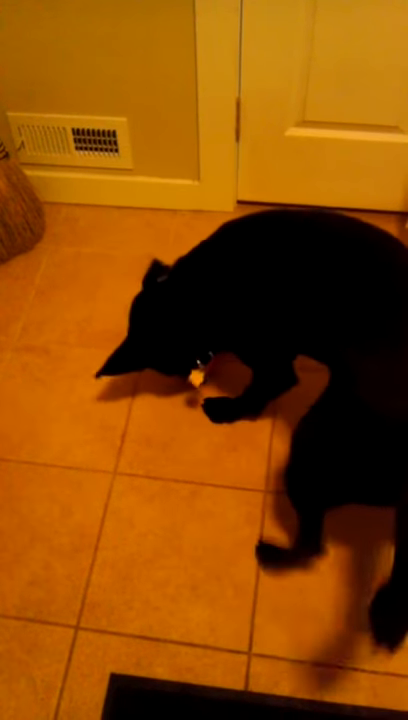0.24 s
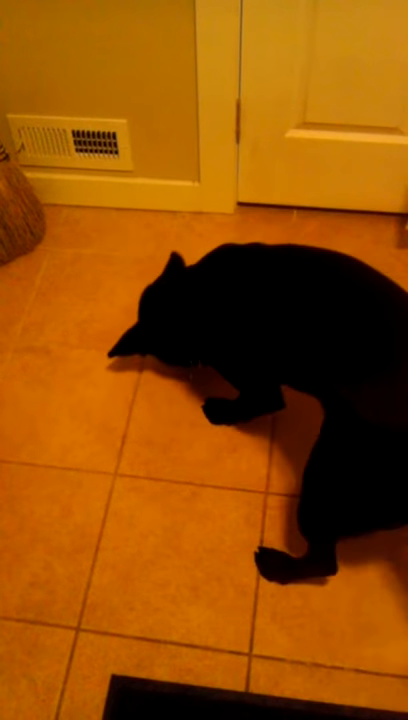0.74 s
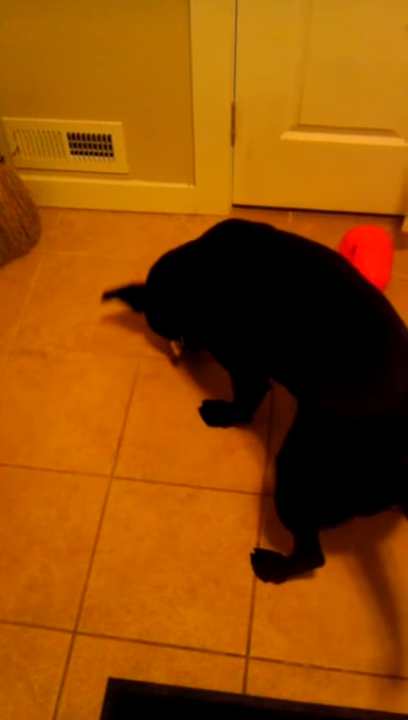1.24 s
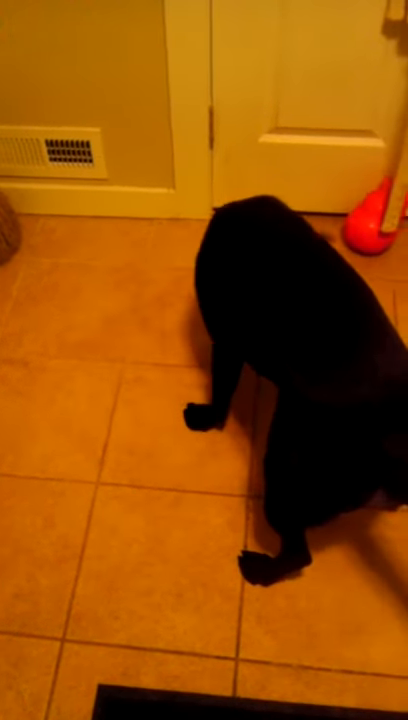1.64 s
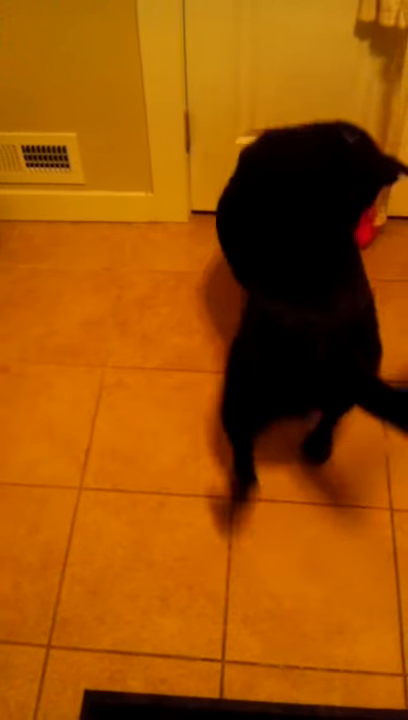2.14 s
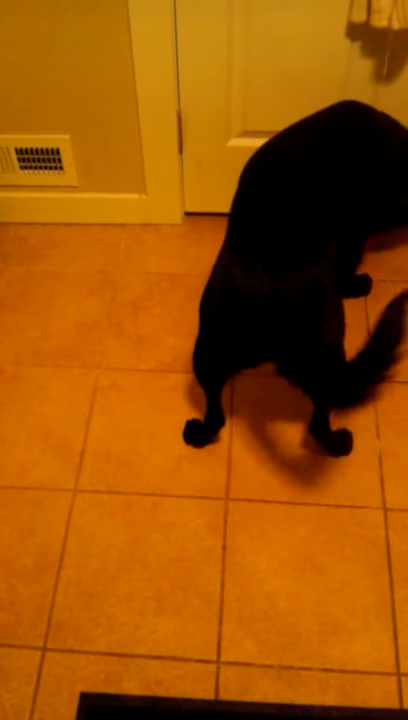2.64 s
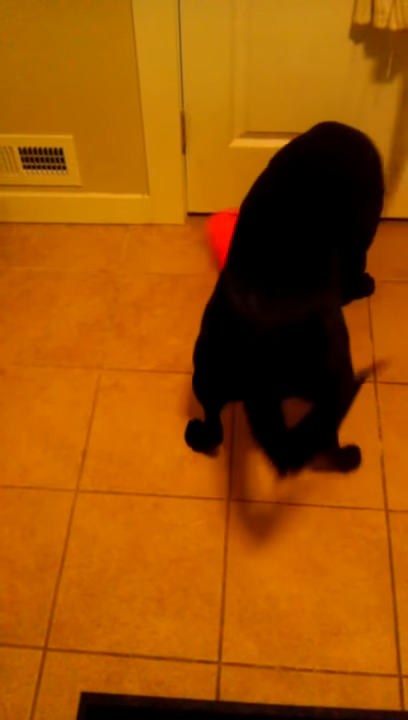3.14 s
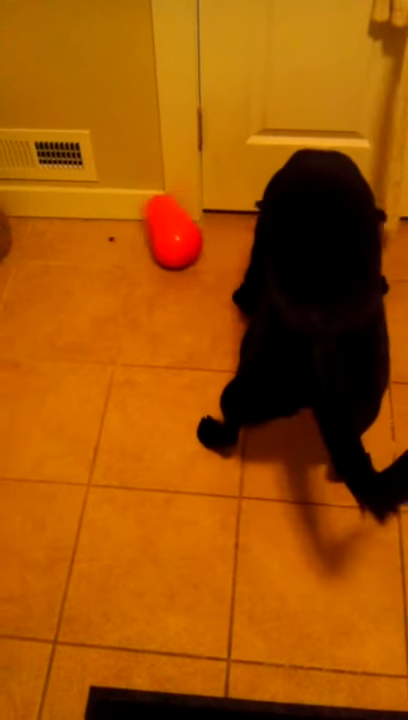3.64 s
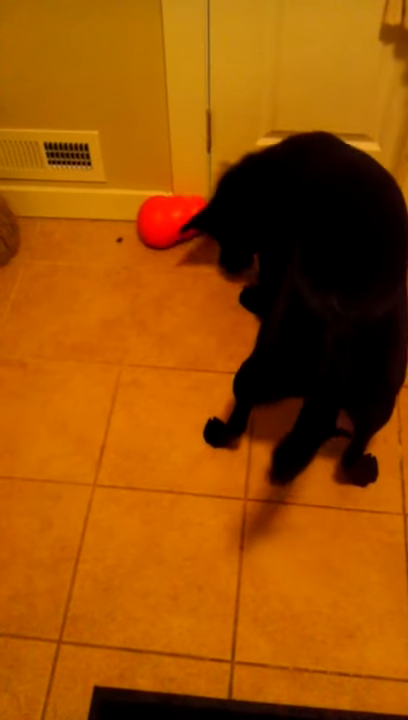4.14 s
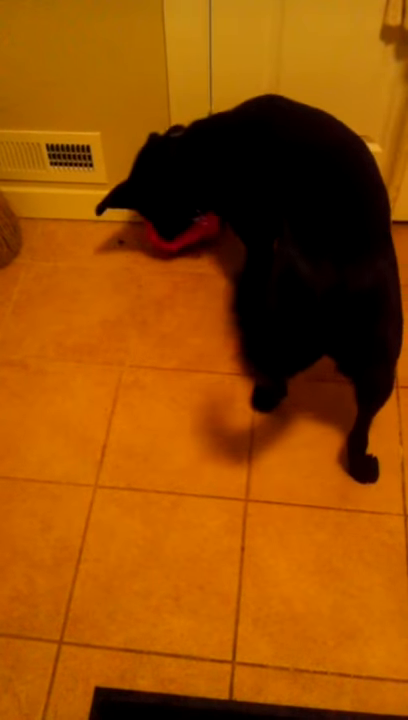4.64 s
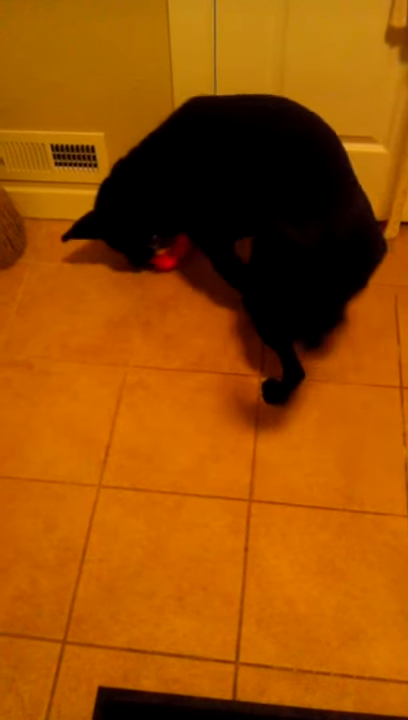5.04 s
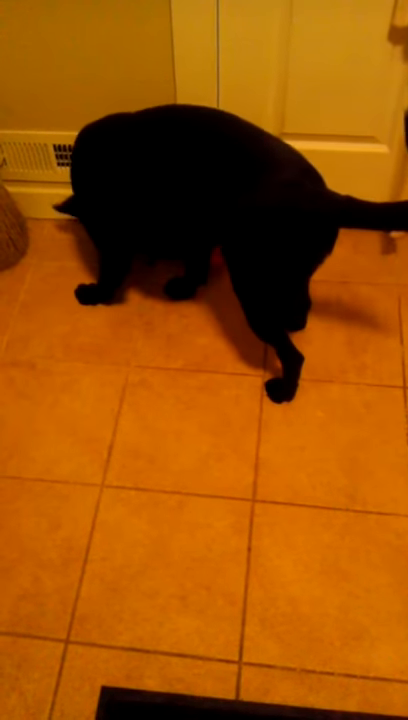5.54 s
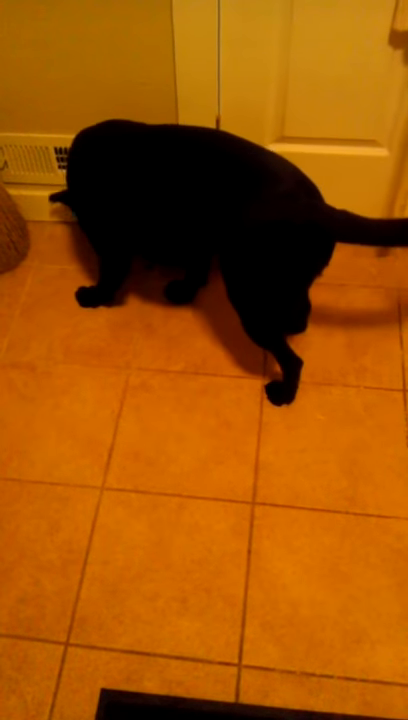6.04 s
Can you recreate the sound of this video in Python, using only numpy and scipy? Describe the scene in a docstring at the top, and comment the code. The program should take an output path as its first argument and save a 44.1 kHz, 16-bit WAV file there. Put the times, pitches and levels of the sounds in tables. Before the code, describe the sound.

Hollow plastic knocks, low rolling and bright kibble rattles as a dog noses a food toy across indoor tiles.

```python
"""A tiled hall: a dog noses a hollow hard plastic food toy, a couple of metres from a phone.
The shell knocks on tiles, door and skirting, ringing in low modes, and rolls with a rumble.
Kibble tumbles against its thin wall, claws tick, the dog snuffles, the house gives a steady hush.
One microphone; the phone spreads it to stereo with two delayed copies and clips the loudest knocks."""
import sys
import numpy as np
from scipy import signal
from scipy.fft import rfft, irfft, next_fast_len
from scipy.io import wavfile
from scipy.ndimage import uniform_filter1d

SR = 44100
rng = np.random.default_rng(int(sys.argv[2]) if len(sys.argv) > 2 else 0)


def unload_audio(sound):
    """Save the sound as a 16-bit wav file, at the path given as the first command line argument."""
    columns = np.transpose(np.atleast_2d(sound))
    # keep every value between -1 and 1, then stretch to whole-number steps
    steps = np.round(np.clip(columns, -1, 1) * 32767)
    wavfile.write(sys.argv[1], SR, steps.astype(np.int16))


N = 277389


def undb(db):
    """dB to gain."""
    return 10 ** (np.asarray(db) / 20)


def unit(x):
    """Scale to rms 1."""
    return x / np.sqrt(np.mean(x ** 2))


def unit_onset(x):
    """Scale the first 20 ms to rms 1."""
    return x / np.sqrt(np.mean(x[:SR // 50] ** 2))


def fade(t60_s, count):
    """Exponential decay."""
    return np.exp(-np.log(1000) * np.arange(count) / SR / t60_s)


def held_fade(t60_s, count, bend):
    """Decay that holds at first, then falls ever faster."""
    return fade(t60_s, count) ** ((np.arange(count) / SR / t60_s) ** bend)


def ring(x, hz, width_hz):
    """Two-pole resonance, gain 1 at the centre."""
    return signal.lfilter(*signal.iirpeak(min(hz, .45 * SR), hz / width_hz, fs=SR), x)


def ring_twice(x, hz, width_hz):
    """Two equal resonances in series."""
    return ring(ring(x, hz, width_hz), hz, width_hz)


def add(track, time_s, sound):
    """Mix a sound in at a time."""
    start = int(time_s * SR)
    track[start:start + len(sound)] += sound[:N - start]


def grains(count, per_s, spread_db):
    """Random clicks of either sign and uneven size."""
    hit = rng.random(count) < per_s / SR
    size = np.minimum(rng.exponential(size=count), 3)
    return hit * np.sign(rng.standard_normal(count)) * undb(spread_db * size)


def wander(rate_hz):
    """Smooth random drift, rms 1."""
    span = int(SR / rate_hz)
    return unit(uniform_filter1d(uniform_filter1d(rng.standard_normal(N), span), span))


def hush():
    """Steady noise of the house and the microphone."""
    # noise spectrum: (frequency [Hz], relative density [dB])
    spectrum = [(15, -56), (25, -19), (54, -9), (159, -8), (323, 3.5), (578, -0.5), (714, 4.5),
                (2530, -15.5), (5450, -10.5), (8090, -43.5), (9740, -25.5), (12700, -28.5), (13700, -27)]
    at_hz, density_db = np.transpose(spectrum)
    hz = np.fft.rfftfreq(N, 1 / SR) + 1
    shape = undb(np.interp(np.log(hz), np.log(at_hz), density_db))
    level_db = -51 + 0.66 * wander(rate_hz=1)
    return undb(level_db) * unit(irfft(rfft(rng.standard_normal(N)) * shape, N))


def hall(x):
    """Direct sound plus dense reflections off tiles and walls."""
    # reverberation: (frequency [Hz], t60 [s], relative level [dB])
    reverb = [(100, 0.27, -21), (249, 0.52, -4), (690, 0.19, -1.5), (1880, 0.36, -2), (4400, 0.32, 1.5),
              (8500, 0.15, 5), (12900, 0.073, -0.5)]
    wet_db, early_db, early_s = -6.5, 4, 0.035
    at_hz, t60s, levels = np.transpose(reverb)
    count = int(.6 * SR)
    t = np.arange(count) / SR
    tail = 0
    for hz in 100 * 2 ** np.arange(0, 7.1, .5):
        band = signal.butter(2, [hz / 2 ** .25, hz * 2 ** .25], "bandpass", fs=SR, output="sos")
        t60_s, db = (np.interp(np.log(hz), np.log(at_hz), column) for column in (t60s, levels))
        tail += undb(db) * signal.sosfilt(band, rng.standard_normal(count)) * fade(t60_s, count)
    tail *= undb(early_db / (1 + (t / early_s) ** 6))  # nearby walls and door
    tail *= np.clip(t / 0.0014, 0, 1)
    tail /= np.sqrt(np.sum(tail ** 2))
    return x + signal.fftconvolve(x, undb(wet_db) * tail)[:N]


def snuffles():
    """Breathy puffs through the nose: quick rise, rounded end."""
    # puffs: (time [s], level [dB], resonance [Hz], length [s])
    puffs = [(0.142, -45.5, 780, 0.14), (0.351, -46.5, 620, 0.053), (2.09, -49, 710, 0.064),
             (2.199, -40.5, 386, 0.052), (2.421, -40.5, 870, 0.072), (3.233, -40.5, 845, 0.072),
             (3.523, -41.5, 710, 0.067), (5.458, -46, 930, 0.12), (5.709, -41.5, 436, 0.065),
             (5.969, -51.5, 323, 0.14), (6.046, -45, 470, 0.046), (6.108, -48.5, 910, 0.072)]
    out = np.zeros(N)
    t = np.arange(int(.4 * SR)) / SR
    for time_s, db, hz, length_s in puffs:
        breath = rng.standard_normal(len(t))
        puff = unit(ring_twice(breath, 430, 670) + ring(breath, hz, 110))
        envelope = np.clip(t / 0.0042, 0, 1) * np.exp(-(t / length_s) ** 2)
        add(out, time_s, undb(db) * puff * envelope)
    return out


def toy_wall(impacts, top_db=0):
    """Thin plastic ringing under small impacts; top_db shifts the modes above 6 kHz."""
    # wall resonances as the microphone colours them: (centre [Hz], width [Hz], gain [dB])
    resonances = [(2730, 4500, -8.5), (3790, 2520, 6), (5950, 3490, 7), (6520, 2400, 16),
                  (7540, 5960, 12.5), (8870, 660, 15), (8970, 290, 12.5), (10000, 2200, 6)]
    return sum((-1) ** k * undb(db + top_db * (hz > 6000)) * ring(impacts, hz, width_hz)
               for k, (hz, width_hz, db) in enumerate(resonances))


def rolling():
    """The shell bumps over tile glaze, joints and grit while kibble slides and tumbles."""
    # toy in motion: (time [s], rumble [dB], upper rumble modes re lowest [dB], kibble [dB], grit [dB])
    motion = [(0.0, -52, -2, -37, -50.5), (0.35, -61, -1, -59, -82), (0.56, -42.5, 0, -50, -54),
              (0.67, -32.5, 5, -40.5, -48), (0.76, -33.5, 12, -44.5, -44.5), (0.82, -53, 3, -53, -45),
              (0.92, -28, 4, -51, -40.5), (1.03, -45.5, 10, -59, -50), (1.12, -35, -1.5, -53, -52),
              (1.4, -45, 1.5, -48.5, -47.5), (1.72, -27.5, -2, -49.5, -51),
              (1.81, -44.5, -4.5, -72.5, -50.5), (1.911, -29, -1, -50, -50), (2.02, -49, -2, -59, -80),
              (2.64, -62, -3, -68, -88), (2.848, -35, -7, -19, -28.5), (3.01, -34.5, 14, -43.5, -38.5),
              (3.26, -42, -10, -58, -62.5), (3.4, -32.5, -3.5, -48.5, -46.5), (3.75, -45.5, -4, -55.5, -69),
              (3.9, -27.5, -6, -49, -52), (4.03, -53, 6, -54, -89), (4.62, -62, 8, -58, -57),
              (4.69, -38.5, 4, -42.5, -42.5), (4.77, -30, 8, -26.5, -38.5), (4.9, -56, 0, -58, -50),
              (5.09, -45, 4, -37.5, -46), (5.208, -30, 6, -27.5, -37.5), (5.33, -47.5, -1, -70, -68),
              (5.55, -55, -5, -50.5, -54.5), (6.29, -76, -5, -57.5, -66)]
    times_s, *levels = np.transpose(motion)
    t = np.arange(N) / SR
    rumble_db, upper_db, kibble_db, grit_db = (np.interp(t, times_s, column) for column in levels)
    bumps = grains(N, per_s=500, spread_db=1.5)
    lowest = ring_twice(bumps, 127.5, 23)
    upper = (ring(ring(bumps, 156.3, 31), 160.7, 33)
             + 0.5 * ring(ring(bumps, 181, 52), 179, 52)
             + 0.12 * ring(ring(bumps, 233, 110), 234, 100))
    rumble = (lowest + undb(upper_db) * upper) / np.hypot(1, undb(upper_db))
    kibble = toy_wall(grains(N, per_s=2700, spread_db=1.5) * undb(2 * wander(rate_hz=32)))
    specks = grains(N, per_s=1200, spread_db=6)
    grit = ring(specks, 1240, 560) + ring(specks, 1980, 420) + 0.41 * ring(specks, 4200, 1070)
    return undb(rumble_db) * unit(rumble) + undb(kibble_db) * unit(kibble) + undb(grit_db) * unit(grit)


def clatters():
    """Kibble, shell edge and claws: a strike, then a dying shower of clicks that rings the wall."""
    # strikes: (time [s], level [dB], ring centre [Hz], body re bright part [dB], shower t60 [s],
    # strike squareness [dB])
    strikes = [(0.0165, -37, 7840, -19, 0.082, -10), (0.04, -42, 6750, -31, 0.047, -27),
               (0.1042, -46.5, 7550, -5, .07, -10), (0.2304, -42, 8500, -9.5, 0.25, -25),
               (0.2538, -45.5, 8300, -0.5, 0.13, 8), (0.4115, -52.5, 5700, -24, .12, 0),
               (0.5203, -46, 4900, -15, 0.098, 6), (0.6465, -40, 6100, -7.5, 0.33, -1),
               (0.7363, -34.5, 5670, -18, 0.21, 1), (0.8052, -32, 4970, -1, 0.31, -2),
               (0.8599, -36.5, 4520, -6.5, 0.19, -7), (0.9482, -38, 7800, -26, .12, 1),
               (0.9776, -35.5, 5070, 0, .22, -9), (1.0531, -41, 5330, -3.5, .04, -1),
               (1.2146, -44, 5890, -32, 0.32, -3), (1.3327, -41.5, 3160, -1, 0.19, 4),
               (1.3748, -42, 6000, 1.5, 0.17, 2), (1.474, -46, 4660, -42, 0.041, -6),
               (1.5642, -16, 8700, -5, 0.12, 1.5), (1.724, -44.5, 4740, -4, 0.033, 7),
               (1.8328, -41, 3950, -6, 0.042, 2), (1.8528, -32, 5300, -5.5, 0.11, -3),
               (2.1206, -50, 7900, -35, 0.12, -7), (2.146, -43, 7760, -12, 0.19, -24),
               (2.266, -43, 7840, -9.5, 0.26, -27), (2.299, -37.5, 7440, -13, .05, -22),
               (2.427, -47, 6060, -6, 0.25, -23), (2.5257, -46, 8250, -11, 0.096, 3),
               (2.5813, -41, 9100, -5, 0.27, 4), (2.6765, -17.5, 7560, -18, 0.14, -9),
               (2.6968, -19, 6440, -7.5, 0.1, 5), (2.7806, -24, 8400, -38, .12, 1),
               (2.809, -27.5, 5400, -1, 0.08, -14), (2.8296, -16.5, 5800, -10, 0.12, -7),
               (2.9118, -25.5, 4900, 0, 0.079, 2), (2.929, -22, 5000, -6, 0.091, 9),
               (2.9546, -20.5, 5830, -6.5, 0.27, 9), (3.138, -42, 5000, -7, .06, 7),
               (3.1922, -37.5, 5630, -2, 0.2, 9), (3.2774, -44, 6700, 1, 0.3, -3),
               (3.3103, -23, 7750, -7.5, 0.22, -1), (3.3343, -23.5, 5100, -4.5, 0.041, -15),
               (3.3797, -30.5, 8200, -8.5, 0.087, 13), (3.494, -43.5, 7700, -25, 0.33, -7),
               (3.533, -39.5, 4050, -11, .07, -26), (3.713, -43.5, 8350, -10.5, 0.33, 9),
               (3.7958, -31, 3280, 0, 0.16, 7), (3.8322, -29.5, 5260, -5.5, 0.11, 3),
               (3.874, -38, 7360, -1, 0.087, 0), (4.055, -36.5, 5970, -1, 0.19, -17),
               (4.2006, -16.5, 7400, -5.5, 0.062, -13.5), (4.366, -52, 3280, 7, 0.11, 1),
               (4.3838, -42, 7700, -27, 0.16, 4), (4.405, -41.5, 8100, -14, 0.11, -28),
               (4.4567, -36, 3920, -3.5, 0.17, 4), (4.5173, -34.5, 4100, -0.5, 0.23, 9.5),
               (4.6353, -15, 6550, -23, 0.076, -7.5), (4.7216, -27.5, 5170, -8.5, .22, 2),
               (4.7394, -23.5, 5830, -21, 0.14, 2), (4.768, -29, 4700, -19, 0.28, -19),
               (4.9277, -29, 6200, -28, 0.094, 5), (4.982, -34.5, 4600, -4.5, .19, -24),
               (5.067, -23.5, 5640, -11.5, 0.099, -9), (5.12, -30, 7860, -40, 0.047, 3),
               (5.1641, -18.5, 6340, -14, 0.029, -16), (5.18, -22, 6700, -16, 0.068, 4),
               (5.2993, -32.5, 9100, -11, 0.17, 6.5), (5.5333, -57, 3180, 10, 0.052, -12),
               (5.5612, -47, 5430, -18, .05, -3), (5.6018, -43.5, 5560, -14, .08, 2),
               (5.9269, -55.5, 5500, 6.5, 0.19, -17), (6.1908, -52, 5230, -1, .08, -4),
               (6.214, -58, 3190, 12.5, 0.11, -3)]
    out, count = np.zeros(N), int(.28 * SR)
    t = np.arange(count) / SR
    for time_s, db, centre_hz, body_db, t60_s, strike_db in strikes:
        strike = undb(strike_db)
        rise = np.clip(t * strike / 0.00033, 0, 1)  # slower after a glancing strike
        envelope = rise * held_fade(t60_s, count, bend=0.38) + 1.17 * strike * fade(0.014, count)
        shower = grains(count, per_s=5000, spread_db=2) * envelope
        shower[0] = 3 * strike
        bright = toy_wall(shower, top_db=-11 - 6.5 * np.log2(centre_hz / 5500))
        bright += ring_twice(bright, centre_hz, 0.83 * centre_hz)
        body_hz = 1600 * undb(4.8 * rng.standard_normal())
        body = ring_twice(shower, 1420, 1740) + .5 * ring(shower, body_hz, 200)
        add(out, time_s, undb(db) * (unit_onset(bright) + undb(body_db) * unit_onset(body)))
    return out


def blow(pitch_hz, chatter_t60_s):
    """One impact, then the shell chatters on the surface; modes near the spot's pitch are favoured."""
    # modes of shell, door panel and floor together: (frequency [Hz], level [dB], t60 [s])
    modes = [(137.3, -1, 0.1), (147.1, -5, 0.36), (164.5, -4.5, 0.069), (189.3, 0.5, 0.16),
             (250.2, 6, 0.12), (292.4, -1, 0.19), (332.6, -4.5, 0.21), (358.6, 4.5, 0.087),
             (424, 0.5, 0.069), (488, 0, 0.12), (569.6, 7, 0.06), (678, 1, 0.069), (727, 6, 0.15),
             (791, 9.5, 0.014), (860, 6.5, 0.035), (1070, -11, 0.036), (1105, -6, 0.024), (1290, 10, 0.07),
             (1350, -26, 0.038)]
    count, swell_s = int(.4 * SR), 0.0025
    t = np.arange(count) / SR
    hz, mode_db, t60_s = np.hsplit(np.array(modes), 3)
    level_jitter, pitch_jitter = np.hsplit(rng.standard_normal((len(modes), 2)), 2)
    octaves = np.log2(hz / pitch_hz)
    above_db_per_oct, below_db_per_oct = 13.5 + 4.5 * np.log2(pitch_hz / 250), 27
    loss_db = np.abs(octaves) * np.where(octaves > 0, above_db_per_oct, below_db_per_oct)
    envelopes = undb(mode_db - loss_db + 2.4 * level_jitter) * np.exp(-np.log(1000) * t / t60_s)
    ringing = envelopes * np.sin(2 * np.pi * hz * (1 + 0.023 * pitch_jitter) * t)
    force = grains(count, per_s=3000, spread_db=1) * held_fade(chatter_t60_s, count, bend=0.36)
    force *= np.clip(t / swell_s, .05, 1)  # the curved shell settles
    force[int(.001 * SR)] = 3.4  # the impact
    sound = signal.fftconvolve(force, ringing.sum(axis=0))[:count]
    peak_rms = np.sqrt(uniform_filter1d(sound ** 2, SR // 50).max())
    return sound / peak_rms


def knocks():
    """A blow and two quick rebounds, which ring lower as the heavy base lands."""
    # shell knocks: (time [s], level [dB], pitch [Hz], first rebound re blow [dB], chatter t60 [s])
    hits = [(0.639, -37, 140, -3, 0.091), (0.735, -47, 140, -3, .08), (0.859, -29, 135, -6, 0.085),
            (1.208, -29.5, 376, -3, 0.08), (1.564, -7.5, 580, -2, .12), (1.69, -25.5, 302, -12, 0.16),
            (1.852, -22.5, 310, 0.5, 0.12), (2.581, -20.5, 510, -4, 0.12), (2.695, -11.5, 680, 1, 0.098),
            (2.911, -23, 435, 1.5, 0.16), (3.313, -28.5, 233, -11, 0.14), (3.795, -26, 305, 5, 0.13),
            (4.053, -19.5, 340, -2, 0.072), (4.202, -6, 366, -6, 0.068), (4.723, -26.5, 370, 5, .11),
            (4.985, -32.5, 132, -14, 0.17), (5.185, -27.5, 336, 0, 0.054)]
    gap_s, lowest_hz = .027, 135
    out = np.zeros(N)
    for time_s, db, pitch_hz, rebound_db, t60_s in hits:
        rebound_hz = max(0.53 * pitch_hz, lowest_hz)
        loss_db = 7 * 0.086 / t60_s  # deader knocks lose more
        add(out, time_s, undb(db) * blow(pitch_hz, t60_s))
        add(out, time_s + gap_s, undb(db + rebound_db) * blow(rebound_hz, t60_s))
        add(out, time_s + 2 * gap_s, undb(db + rebound_db - loss_db) * blow(rebound_hz, t60_s))
    return out


def scene():
    """All sources reach one microphone through the hall."""
    low_cut = signal.butter(7, 112, "highpass", fs=SR, output="sos")  # a small toy radiates little bass
    mic_port = signal.butter(2, 11400, "lowpass", fs=SR, output="sos")
    room = hall(clatters() + knocks() + snuffles() + rolling())
    mono = signal.sosfilt(mic_port, signal.sosfilt(low_cut, room)) + hush()
    return np.array([mono, mono])


def record(dry):
    """Side signal from a dull early copy and a bright late inverted one; hard clip; top cut."""
    # stereo spread: (frequency [Hz], early copy gain [linear], late copy gain [linear])
    spread = [(100, 0.92, 0.012), (700, 0.86, .04), (2000, 0.83, .05), (3960, 0.78, 0.34),
              (7000, 0.39, 0.73), (10000, 0.29, 0.93), (13100, 0.33, 0.6)]
    early_s, late_s, early_lead_rad = 71.7 / SR, 178 / SR, .25
    at_hz, early_gain, late_gain = np.transpose(spread)
    mid = dry.mean(axis=0)
    size = next_fast_len(N + 1024)
    hz = np.fft.rfftfreq(size, 1 / SR) + 1e-3
    early = np.interp(hz, at_hz, early_gain) * np.exp(1j * (early_lead_rad - 2 * np.pi * hz * early_s))
    late = np.interp(hz, at_hz, late_gain) * np.exp(-2j * np.pi * hz * late_s)
    side = irfft(rfft(mid, size) * (early - late), size)[:N]
    clipped = np.clip([mid + side, mid - side], -1, 1)
    top_cut = signal.ellip(10, .2, 60, 13878, fs=SR, output="sos")
    return np.clip(signal.sosfilt(top_cut, clipped), -1, 1)


dry = scene()
out = record(dry)
unload_audio(out)
```